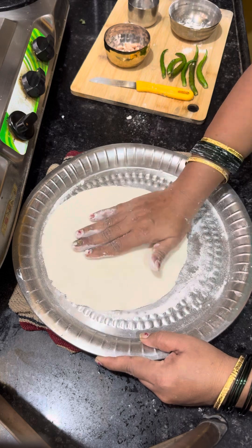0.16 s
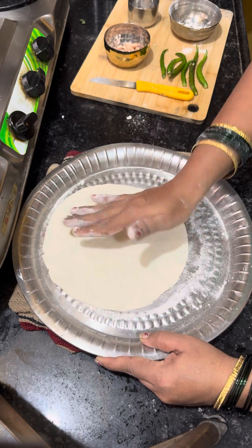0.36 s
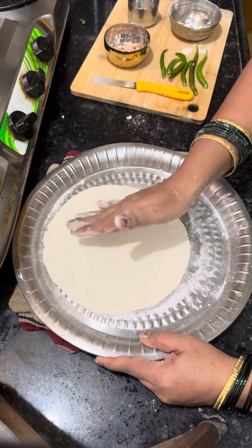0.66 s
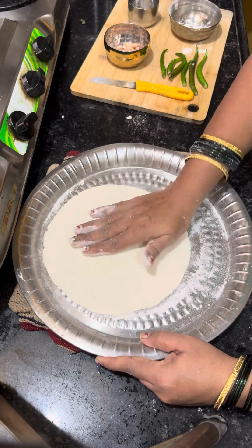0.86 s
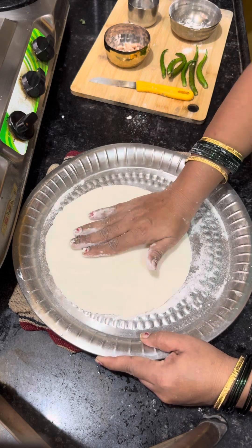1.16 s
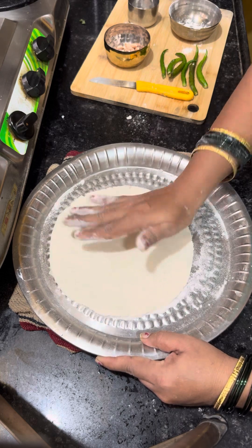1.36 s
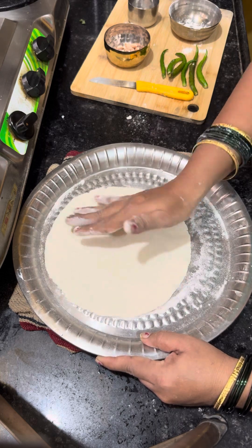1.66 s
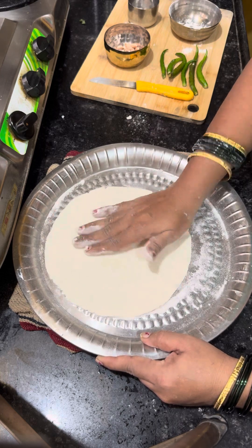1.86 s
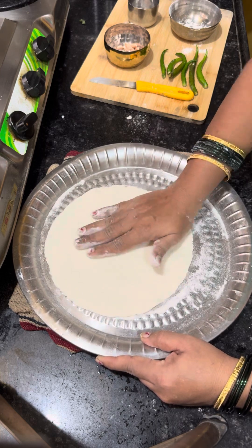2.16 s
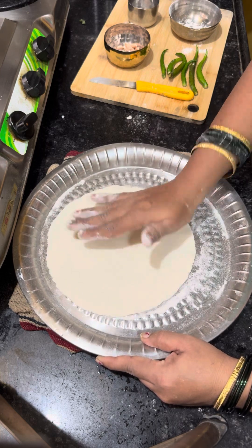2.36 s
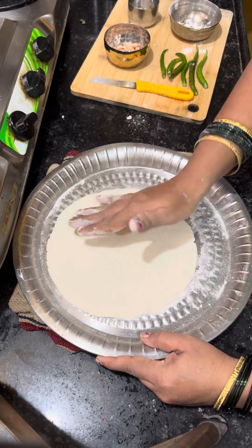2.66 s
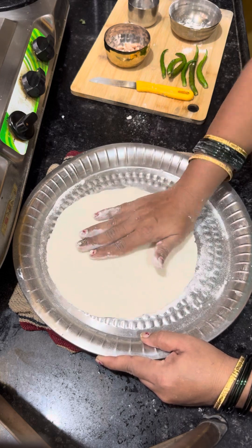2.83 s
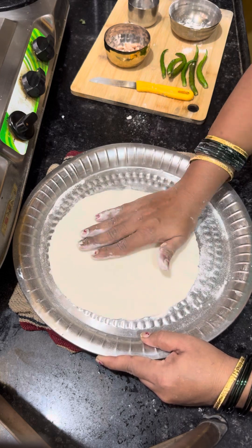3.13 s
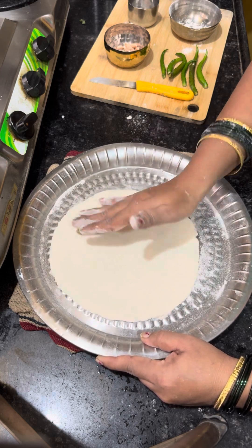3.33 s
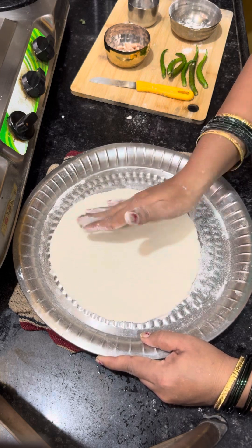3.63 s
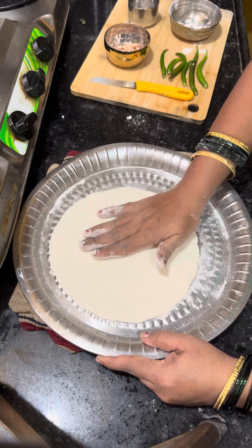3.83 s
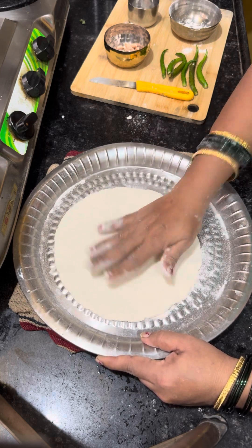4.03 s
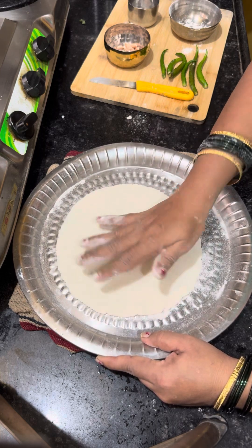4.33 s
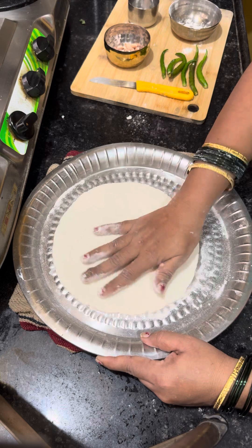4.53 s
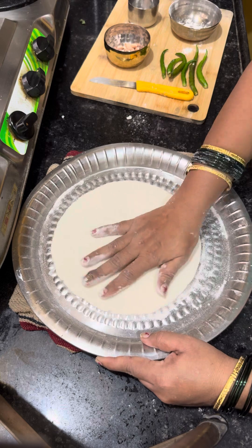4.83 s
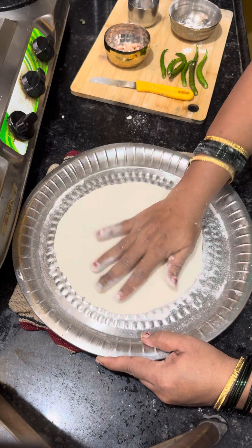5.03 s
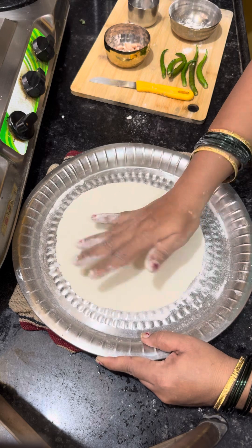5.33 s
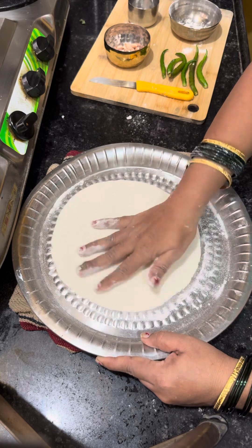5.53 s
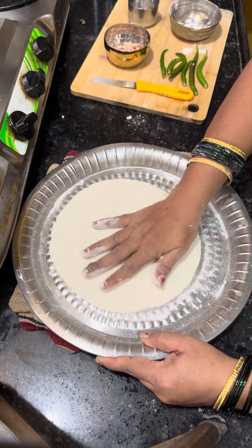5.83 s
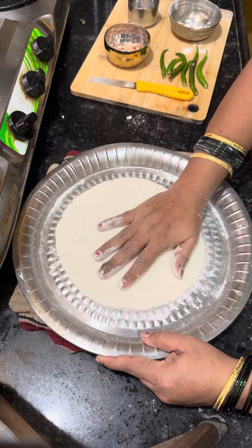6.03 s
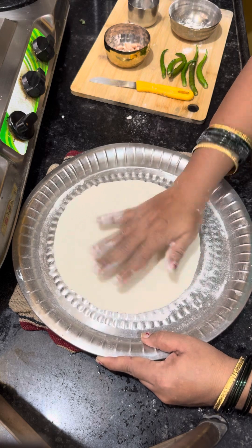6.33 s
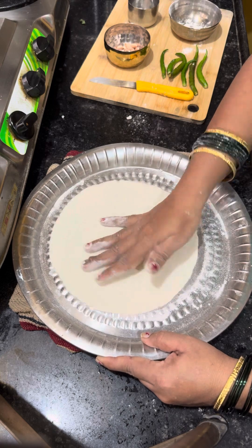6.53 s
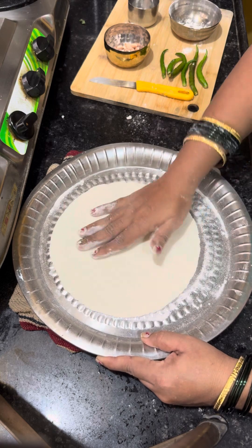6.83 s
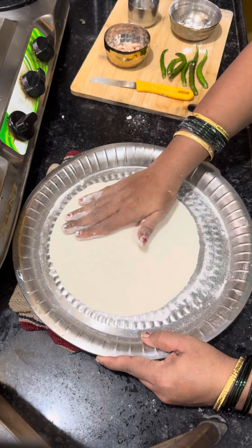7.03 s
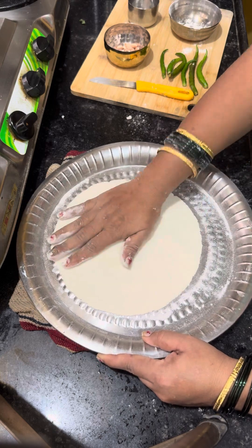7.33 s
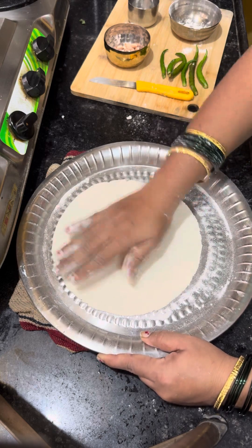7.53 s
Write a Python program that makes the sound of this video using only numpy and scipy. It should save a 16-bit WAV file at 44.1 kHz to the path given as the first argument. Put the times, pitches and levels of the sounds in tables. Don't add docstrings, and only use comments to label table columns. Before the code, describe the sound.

Close in a small hard-surfaced kitchen, a palm pats dough on a thin steel plate about three times a second. Each dull, airy slap is followed at once by a clack and short ring as the plate knocks on stone, then a faint flour hiss. After four seconds the clacks soften, and a few pats leave the plate still. A tiny far whistle passes near five seconds. Soft room hum throughout.

```python
import sys
import numpy as np
from scipy import signal
from scipy.io import wavfile

SR = 44100
rng = np.random.default_rng(int(sys.argv[2]) if len(sys.argv) > 2 else 0)


def inscribe(sig):
    pcm = np.round(np.clip(np.atleast_2d(sig).T, -1, 1) * 32767)
    wavfile.write(sys.argv[1], SR, pcm.astype(np.int16))


def to_linear_factor(level_db):
    exponent = np.asarray(level_db, float) / 20
    return 10 ** exponent


N = 338671
LEAD = 1024
PIECE = 4096


def rms_one(x):
    return x / np.sqrt(np.mean(x ** 2) + 1e-20)


def at_hz(points, hz):
    table_hz, values = np.transpose(points)
    return np.interp(np.log(hz), np.log(table_hz), values)


def over_time(points, t):
    return to_linear_factor(np.interp(t, *np.transpose(points)))


def add(track, s, piece):
    i = round(s * SR) - LEAD
    track[i:i + len(piece)] += piece[:N - i]


EDGES = 20 * 2 ** np.arange(0, 9.8, .4)


def bands(length):
    white = rng.standard_normal((2, length))
    for k, (low, high) in enumerate(zip(EDGES, EDGES[1:])):
        sos = signal.butter(2, [low, high], "band", fs=SR, output="sos")
        yield np.sqrt(low * high), signal.sosfilt(sos, white[k % 2])


def highpass(x, hz, order=2):
    return signal.sosfilt(signal.butter(order, hz, "high", fs=SR, output="sos"), x)


def drift(rate):
    r = np.exp(-80 * np.pi * rate / SR)
    slow = signal.lfilter([1], [1, -2 * r, r * r], rng.standard_normal(N // 40 + 2002))[2000:]
    return np.interp(np.arange(N) / 40, np.arange(len(slow)), rms_one(slow))


def ring(x, hz, t60):
    r, w = to_linear_factor(-60 / (t60 * SR)), 2 * np.pi * hz / SR
    return signal.lfilter([0, np.sin(w)], [1, -2 * r * np.cos(w), r * r], x)


def decay(x, t60):
    return signal.lfilter([1], [1, -to_linear_factor(-60 / (t60 * SR))], x)


def swell(rise_ms, fall_ms):
    t = (np.arange(PIECE) - LEAD) * 1000 / SR
    return np.exp(np.minimum(t / max(rise_ms, .1), -t / max(fall_ms, .1)))


def strike(times, pushes, modes, damping, spread_db, smear):
    out = np.zeros(N)
    luck = rng.standard_normal((len(times), len(modes), 4, 2))
    for s, push, damp, row in zip(times, pushes, damping, luck):
        push = np.pad(push, (0, SR // 6))
        for k, ((hz, db, t60), parts) in enumerate(zip(modes, row)):
            split = sum(to_linear_factor(spread_db * a) * ring(push, hz * (1 + smear * b), t60 * damp)
                        for a, b in parts)
            add(out, s, (-1) ** k * to_linear_factor(db) * split)
    return out


# (time [s], peak level [dB], trapped-air pitch [Hz], landing time [ms])
SLAPS = [(0.138, -22, 1100, 6.6), (0.472, -15.5, 1160, 3.1), (0.795, -24.5, 840, 8.2),
         (1.126, -23.5, 656, 11), (1.458, -16.5, 1090, 4.4), (1.786, -15.5, 1180, 3.1),
         (2.115, -21.5, 1190, 3.5), (2.449, -21, 1080, 3.9), (2.781, -22, 980, 5.1),
         (3.117, -23.5, 990, 5.3), (3.448, -29, 1080, 4.4), (3.784, -20.5, 920, 6.6),
         (4.099, -15, 850, 2.4), (4.424, -17, 850, 1.2), (4.751, -17.5, 1080, 1.9), (5.09, -16, 850, 0.33),
         (5.424, -19.5, 756, 0.7), (5.43, -19.5, 570, 1.3), (5.74, -19.5, 860, 1.6),
         (6.064, -16.5, 850, 0.32), (6.404, -14, 826, 3), (6.75, -21.5, 1040, 3.4), (7.341, -20, 940, 3.3),
         (7.629, -17.5, 1250, 3.7)]
# (frequency [Hz], level [dB], t60 [s])
BENDING = [(54.7, 1, 0.035), (96, -9.5, 0.24), (191.7, -6.5, 0.27), (238, -5.5, 0.63), (277.3, 1.5, 0.98),
           (319, -8, 0.063), (577, 3.5, 0.44)]


def slaps():
    out = np.zeros(N)
    full = [any(0 < clack[0] - row[0] < .03 for clack in CLACKS) for row in SLAPS]
    pop_band = signal.butter(2, [280, 3300], "band", fs=SR, output="sos")
    # (share of pitch, level [dB], cycles to t60)
    pockets = [(.55, -10, 1.3), (1, 7, 9), (1.5, 2.5, 9), (2.3, 5.5, 1.56)]
    for (s, db, hz, landing_ms), rocks in zip(SLAPS, full):
        landing = 0.27 * swell(landing_ms, fall_ms=5.0) * rng.standard_normal(PIECE)
        landing[LEAD - 40] += 1
        pop = sum(to_linear_factor(level_db) * ring(landing, share * hz, cycles / (share * hz))
                  for share, level_db, cycles in pockets)
        pop = signal.sosfilt(pop_band, pop)
        add(out, s, to_linear_factor(db - 0.5) * pop / np.abs(pop).max())

        hiss_db = db - 27 + 10.5 * np.log2(hz / 1000) + 0.27 * landing_ms
        if not rocks:
            hiss_db -= 8.5
        skin = 1.4 * swell(rise_ms=1.0, fall_ms=2.5) + 0.9 * swell(rise_ms=landing_ms, fall_ms=32)
        add(out, s, to_linear_factor(hiss_db) * skin * highpass(rng.standard_normal(PIECE), 2100))

    push = swell(rise_ms=0.36, fall_ms=0.21)
    soft = swell(rise_ms=1.8, fall_ms=1.8)
    full_push, light_push = to_linear_factor(-45) * push / push.sum(), to_linear_factor(-39) * soft / soft.sum()
    pushes = [full_push if rocks else light_push for rocks in full]
    damping = np.full(len(SLAPS), 0.85)
    return out + strike([row[0] for row in SLAPS], pushes, BENDING, damping, spread_db=3.0, smear=0.022)


# (time [s], peak level [dB], brightness [dB], rim jangle [dB], free ring [0-1])
CLACKS = [(0.146, -12, -25.5, -41.5, 0.08), (0.481, -14.5, -25, -43, 0), (0.804, -11, -20, -35, 0.34),
          (1.135, -17, -24.5, -49, 0.01), (1.467, -15.5, -24, -45, 0), (1.793, -11.5, -21.5, -35.5, 0.23),
          (2.124, -12.5, -22, -33.5, 0.16), (2.458, -9.5, -18, -32, 0.23), (2.791, -11, -22.5, -33.5, 0.2),
          (3.123, -12.5, -22.5, -35, 0.16), (3.46, -11.5, -21, -32.5, 0.32), (3.794, -16, -22, -37, 0.3),
          (4.117, -19, -37, -49, 0.06), (4.447, -23, -39.5, -53.5, 0.21), (5.106, -22, -35, -48, 0.01),
          (5.443, -19.5, -32.5, -47.5, 0.02), (5.753, -19.5, -31, -50, 0.07), (6.082, -21, -31.5, -50, 0),
          (6.417, -16, -27.5, -46.5, 0.04), (6.763, -14.5, -26.5, -46, 0.09)]
# (frequency [Hz], level [dB], t60 [s])
RINGING = [(727, -33, 0.6), (850, -34, 0.087), (1075, -5.5, 0.57), (1100.3, 4.5, 0.22), (1176, -5.5, 0.053),
           (1235, -16.5, 0.48), (1590, -12.5, 0.67), (2480, -7.5, 0.22)]
# (frequency [Hz], level [dB], t60 [s])
EDGE = [(1760, 4, 0.13), (1767, -9, 0.48), (1823, -4, 0.63), (1904, -4.5, 0.25), (2020, -1, 0.26),
        (2097, 0, 0.084)]
# (frequency [Hz], level [dB], t60 [s])
HOOP = [(2555, 0, .24), (2592, -1.5, .22)]
# (frequency [Hz], level [dB], t60 [s])
RIM = [(3200, -10, .18), (3960, -7, .09), (4430, -9, .09), (4940, -3, .18), (4980, 9, .035),
       (5040, -4, .13), (5900, 4, .035), (5920, -4, .15), (7010, -5, .14), (7320, -9, .12),
       (8080, -12, .12)]
# (frequency [Hz], level [dB per Hz])
SHIMMER = [(180, -8), (300, -9), (780, -16), (1090, -16.5), (1400, -24), (1800, -16), (3410, -23.5),
           (5020, -24.5), (15200, -21.5), (16500, -36)]
# (frequency [Hz], t60 [s])
SHIMMER_T60 = [(300, 0.45), (1500, 0.51), (5000, 0.31), (15000, 0.16)]


def clacks():
    at, db, bright_db, jangle_db, free = np.transpose(CLACKS)
    runup_ms = 1.3
    shape = (len(at), PIECE)
    chatter = rng.standard_normal(shape) * (rng.random(shape) < .1) * swell(runup_ms, 1.9)
    blows, contacts = .1 * chatter, .35 * chatter
    blows[:, LEAD] = contacts[:, LEAD] = -1

    def hit(level_db, modes, damping, spread_db, smear):
        return strike(at, to_linear_factor(level_db)[:, None] * blows, modes, damping, spread_db, smear)

    damping = np.clip(0.13 + free, .2, 2)
    out = hit(db - 19, RINGING, damping, spread_db=3.5, smear=0.021)
    out += hit(0.95 * jangle_db - 2, EDGE, damping, spread_db=-2.0, smear=0.013)
    out += hit(0.65 * bright_db - 26, HOOP, np.full(len(at), 0.85), spread_db=1.0, smear=0.01)
    out += hit(jangle_db - 2.5, RIM, damping + 0.25, spread_db=0.9, smear=0.009)

    knock = ring(contacts, 5160, 0.0044)
    knock += 1.1 * ring(contacts, 2130, 0.0022)
    knock += 0.45 * ring(contacts, 11640, 0.0047)
    body, rim = np.full(N, 1e-18), np.full(N, 1e-18)
    contact = swell(runup_ms, 0.78)
    contact /= contact.sum()
    for s, body_db, rim_db, snap in zip(at, db, bright_db, knock):
        add(out, s, to_linear_factor(rim_db + 5) * snap)
        add(body, s, to_linear_factor(body_db - 4.5) * contact)
        add(rim, s, to_linear_factor(rim_db + 5) * contact)

    rattle = to_linear_factor(2.3 * drift(69))
    for hz, noise in bands(N):
        drive = body if hz < 3000 else rim
        crack = decay(drive, 0.036)
        tail = decay(drive, at_hz(SHIMMER_T60, hz))
        out += to_linear_factor(at_hz(SHIMMER, hz) + 13.5) * rattle * noise * (crack + 0.5 * tail)
    return highpass(out, 380)


def puff(hz, rise_ms, fall_ms):
    burst = np.gradient(ring(swell(rise_ms, fall_ms) * rng.standard_normal(PIECE), hz, 11 / hz))
    return burst / np.abs(burst).max()


# (time [s], peak level [dB], length [ms], flour rustle [dB])
TICKS = [(0.076, -48, 4.1, -63), (0.419, -48, 4.1, -72), (0.682, -36, 20, -66), (0.718, -39, 3.8, -43),
         (1.067, -36.5, 4.6, -54), (1.378, -34.5, 17, -54), (1.715, -38, 2.1, -63), (2.053, -45, 6.1, -61),
         (2.378, -45, 6.3, -63), (2.712, -45, 5.0, -60), (3.061, -40, 3.9, -63), (3.409, -37, 5.0, -62),
         (3.726, -43, 5.7, -67), (6.181, -35.5, 32, -52), (6.372, -48, 12, -42), (6.39, -36, 2.4, -48),
         (7.017, -40.5, 15, -49.5), (7.202, -41, 35, -45), (7.293, -35, 25, -60), (7.389, -43, 18, -54),
         (7.541, -34.5, 32, -54)]


def ticks():
    out = np.zeros(N)
    for s, db, ms, rustle_db in TICKS:
        hz = 788 - 2 * ms
        add(out, s, to_linear_factor(db) * puff(hz, rise_ms=4.4, fall_ms=ms))
        add(out, s, to_linear_factor(db - 10) * puff(1.8 * hz, rise_ms=3.0, fall_ms=1.3 * ms))
        rustle = swell(2.8, 1.7 * ms) * highpass(rng.standard_normal(PIECE), 2200)
        add(out, s, to_linear_factor(rustle_db - 9.5) * rustle)
    return out


# (frequency [Hz], t60 [s])
ROOM_T60 = [(60, 0.72), (300, 0.25), (1500, 0.39), (5000, 0.32), (15000, 0.32)]


def kitchen(x):
    t = np.arange(SR) / SR
    echo = sum(noise * to_linear_factor(-60 * t / at_hz(ROOM_T60, hz)) for hz, noise in bands(SR))
    echo = echo * (1 - np.exp(-t / 0.0027)) / np.linalg.norm(echo)
    return signal.fftconvolve(x, echo)[:N]


def steady(spectrum):
    lowest_hz = .7 * spectrum[0][0]
    return rms_one(sum(to_linear_factor(at_hz(spectrum, hz) + 1.5 * drift(35)) * noise
                       for hz, noise in bands(N) if hz > lowest_hz))


# (frequency [Hz], level [dB per Hz])
FLOUR = [(2000, -27), (3500, 2), (7000, -2.5), (10000, -5.5), (13500, -0.5), (16000, -3)]
# (time [s], level [dB])
SLIDE = [(0.0, -58.5), (0.7, -61), (1.3, -58), (1.9, -62.5), (2.3, -62), (3.2, -58.5), (4.2, -61.5),
         (4.9, -59.5), (5.4, -59.5), (6.0, -62), (7.2, -62), (7.68, -75)]


def flour():
    t = np.arange(N) / SR
    pats = np.array([-.19] + [row[0] for row in SLAPS])
    since = t - pats[np.searchsorted(pats, t) - 1]
    fastest_s = .17
    swelling_db = -20 * np.clip(1 - since / fastest_s, 0, 1)
    fading_db = np.maximum(-102 * np.maximum(since - fastest_s, 0), -11.5)
    return over_time(SLIDE, t) * to_linear_factor(swelling_db + fading_db) * steady(FLOUR)


# (time [s], level [dB])
CHIRP = [
    (4.96, -78),
    (5.02, -64),
    (5.06, -61),
    (5.09, -66),
]


def whistle():
    t = np.arange(N) / SR
    level_db = np.interp(t, *np.transpose(CHIRP), left=-150, right=-150)
    return to_linear_factor(level_db) * np.sin(2 * np.pi * 2690 * t)


# (frequency [Hz], level [dB per Hz])
HUM = [(12, -40), (20, 6), (58, -2), (151, 1.5), (281, 1), (351, 2), (599, 4), (913, -1.5), (1110, 1.5),
       (3620, -21.5), (9150, -28.5), (15200, -41), (16500, -44)]
# (time [s], level [dB])
HUM_LEVEL = [
    (0.0, -49.5),
    (2.65, -51.5),
    (5.3, -50),
    (6.6, -52),
    (7.68, -50),
]


def hum():
    return over_time(HUM_LEVEL, np.arange(N) / SR) * steady(HUM)


def scene():
    pats = slaps() + clacks() + ticks()
    return (pats + to_linear_factor(-9) * kitchen(pats) + flour() + whistle() + hum())[None]


def band_limit(x):
    return signal.sosfilt(signal.butter(12, 16980, fs=SR, output="sos"), x)


def record(dry):
    thin = highpass(dry, 60, order=1)
    cut = signal.sosfilt(signal.ellip(12, .5, 60, 15760, fs=SR, output="sos"), thin)
    return band_limit(cut)


dry = scene()
out = record(dry)
inscribe(out)
```